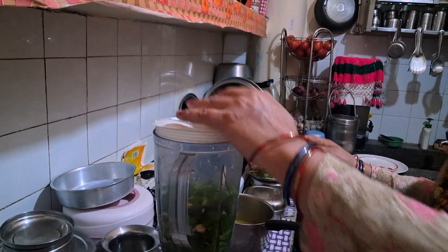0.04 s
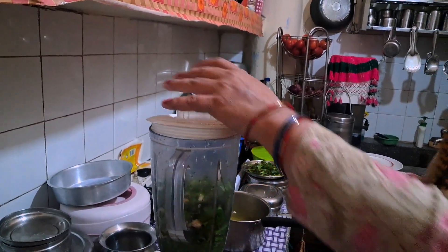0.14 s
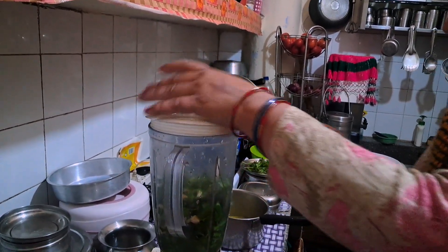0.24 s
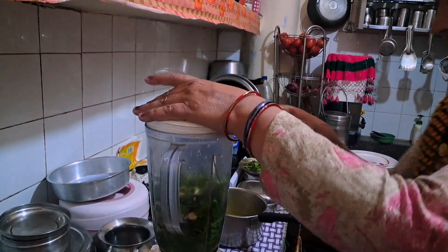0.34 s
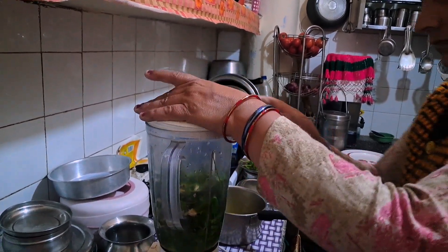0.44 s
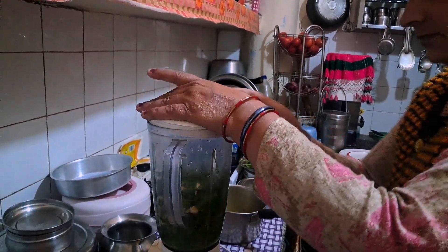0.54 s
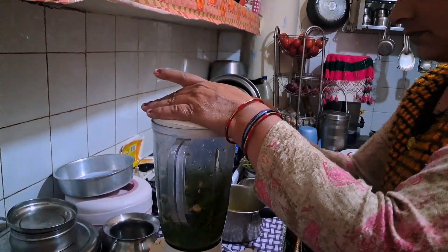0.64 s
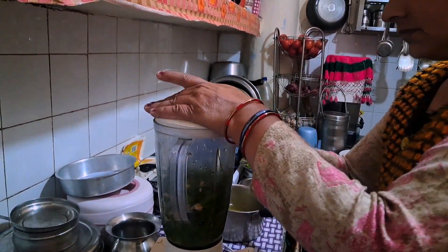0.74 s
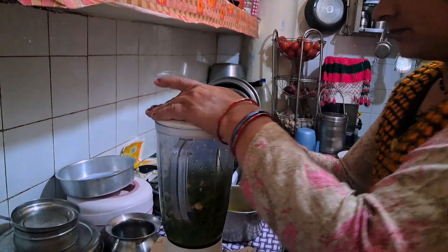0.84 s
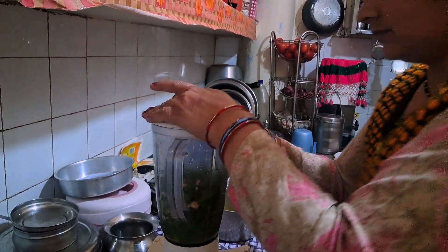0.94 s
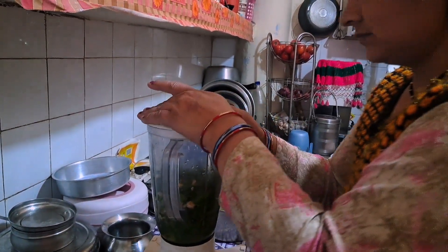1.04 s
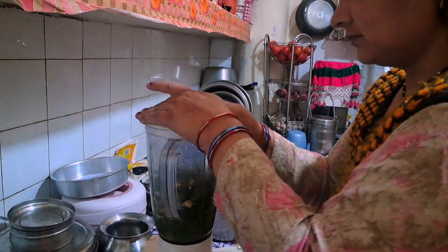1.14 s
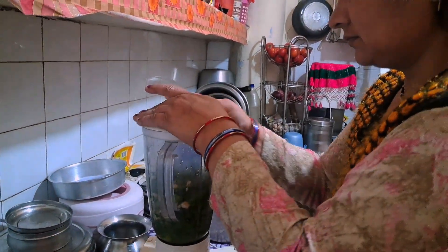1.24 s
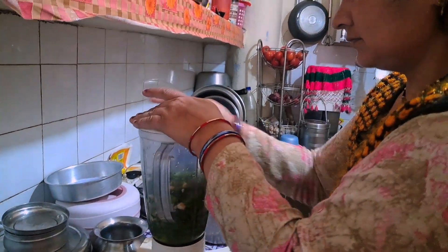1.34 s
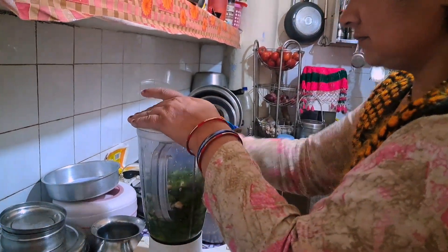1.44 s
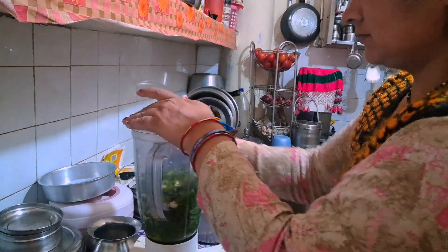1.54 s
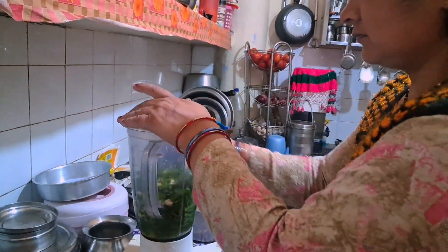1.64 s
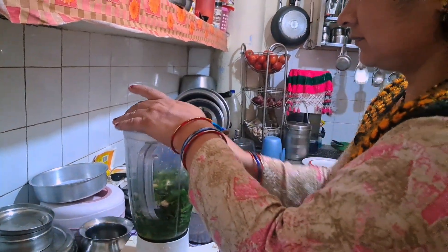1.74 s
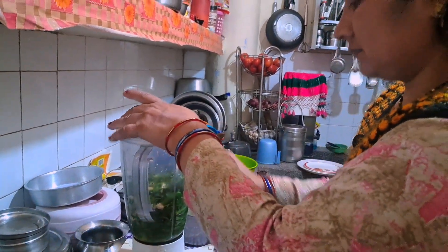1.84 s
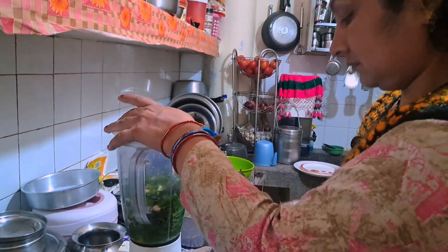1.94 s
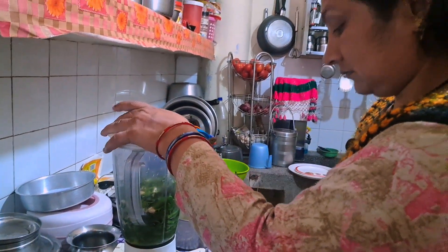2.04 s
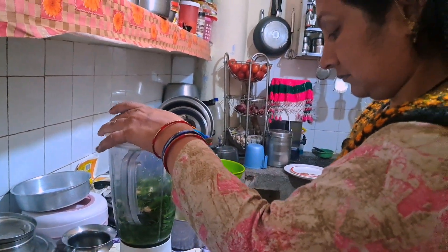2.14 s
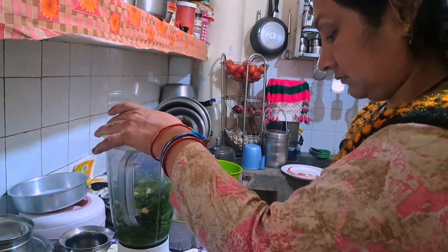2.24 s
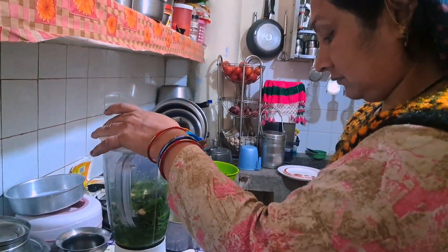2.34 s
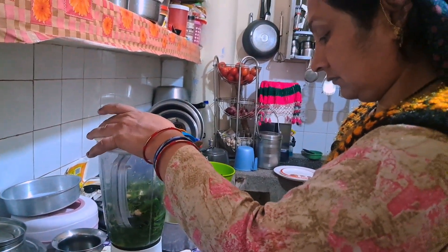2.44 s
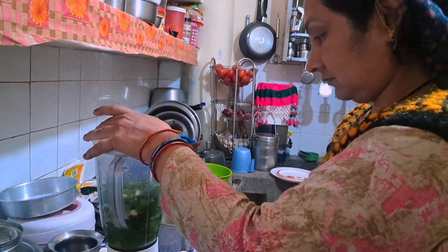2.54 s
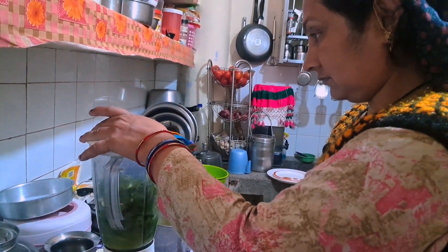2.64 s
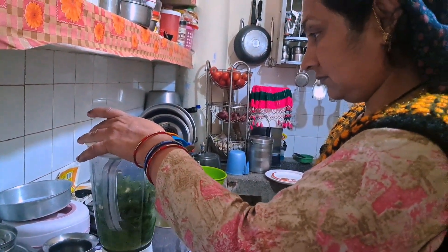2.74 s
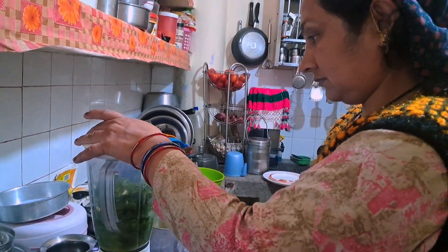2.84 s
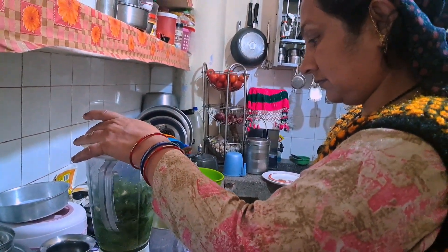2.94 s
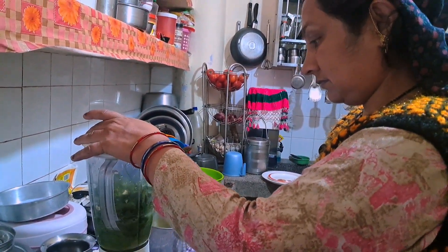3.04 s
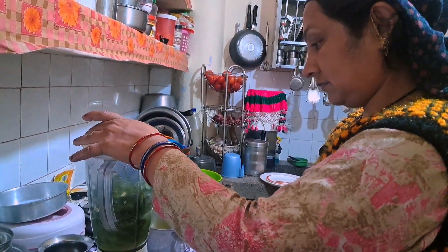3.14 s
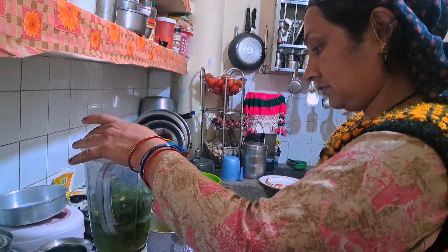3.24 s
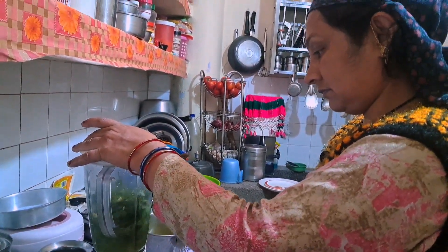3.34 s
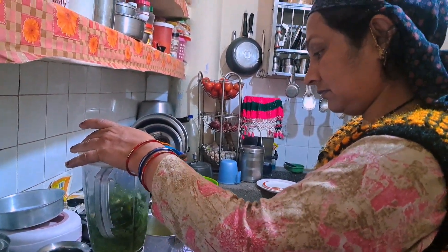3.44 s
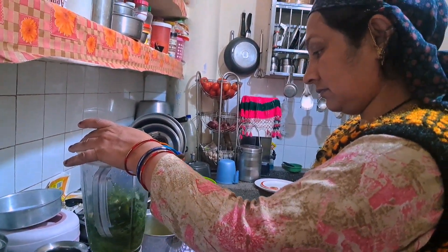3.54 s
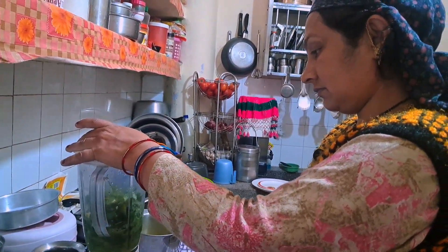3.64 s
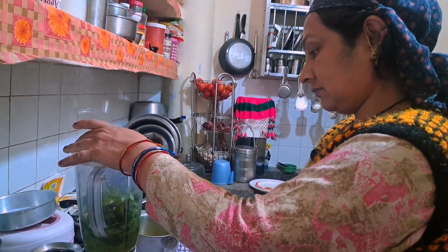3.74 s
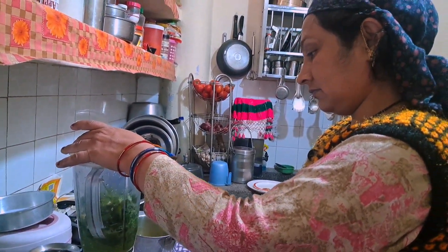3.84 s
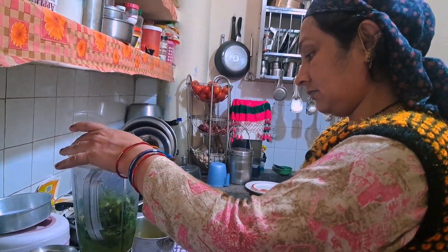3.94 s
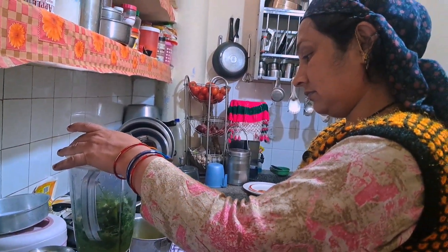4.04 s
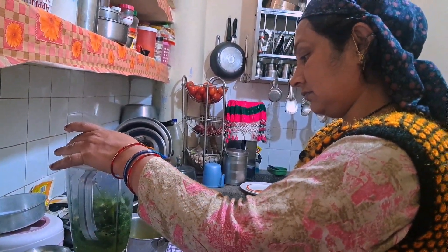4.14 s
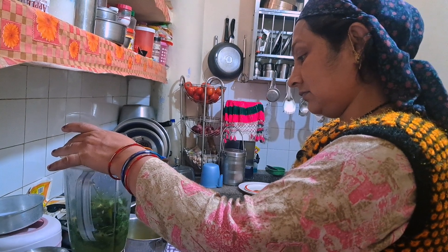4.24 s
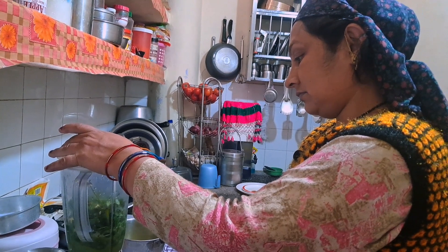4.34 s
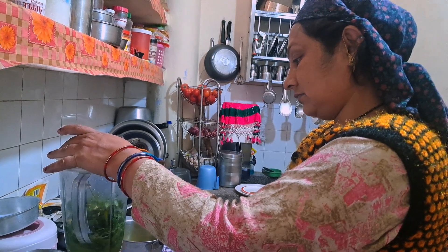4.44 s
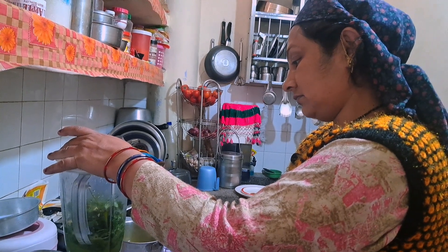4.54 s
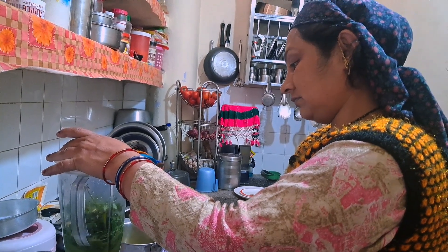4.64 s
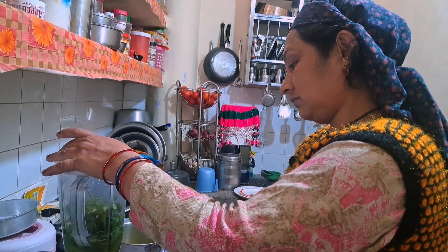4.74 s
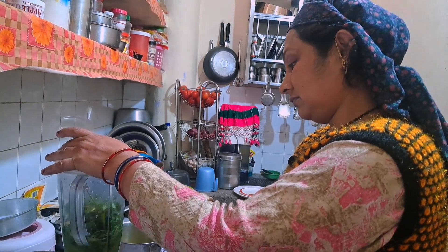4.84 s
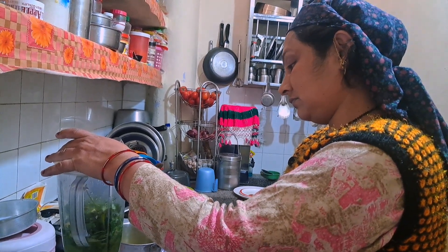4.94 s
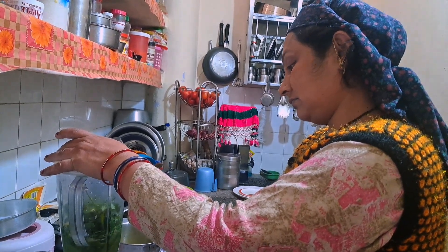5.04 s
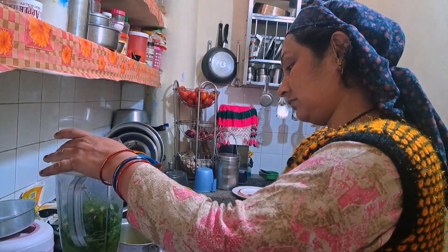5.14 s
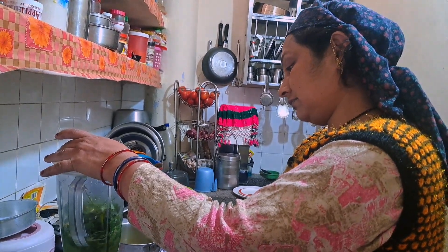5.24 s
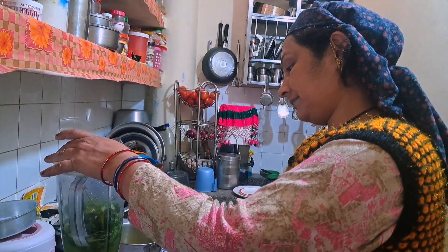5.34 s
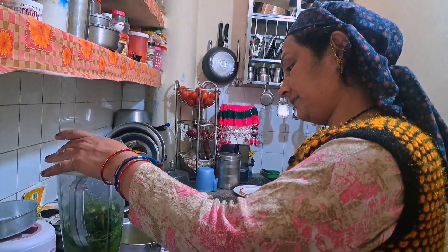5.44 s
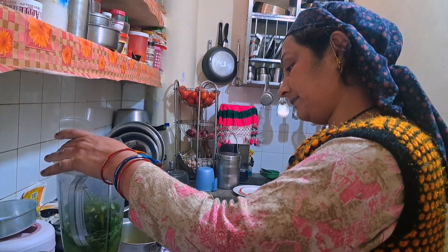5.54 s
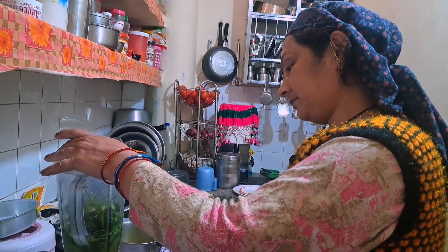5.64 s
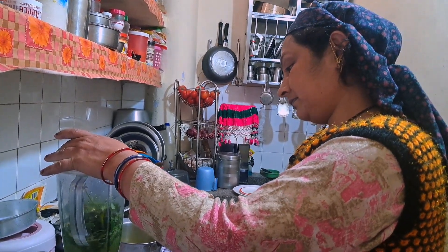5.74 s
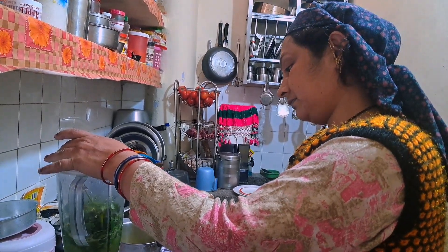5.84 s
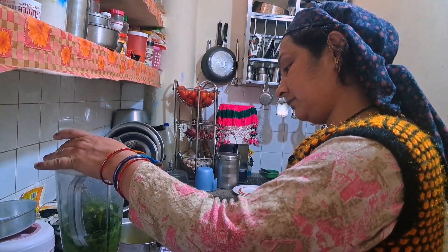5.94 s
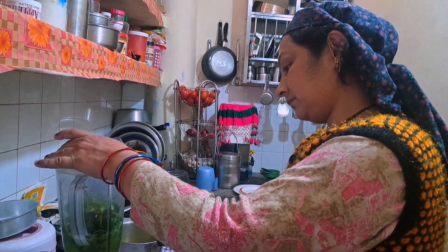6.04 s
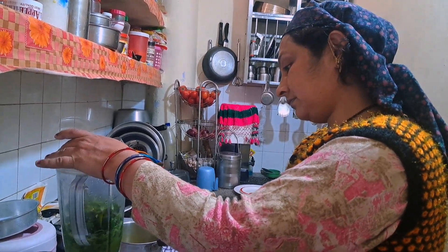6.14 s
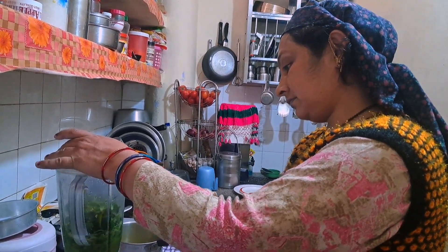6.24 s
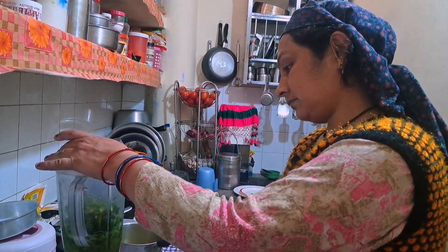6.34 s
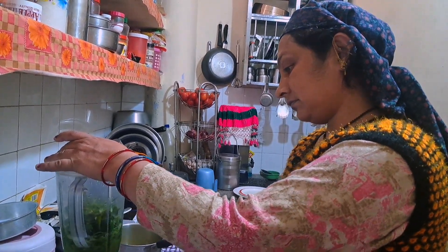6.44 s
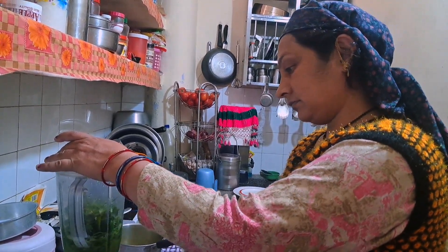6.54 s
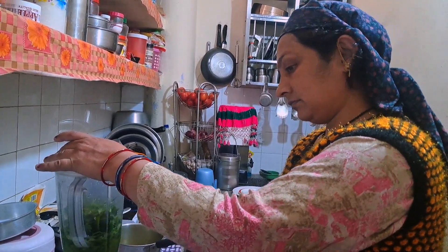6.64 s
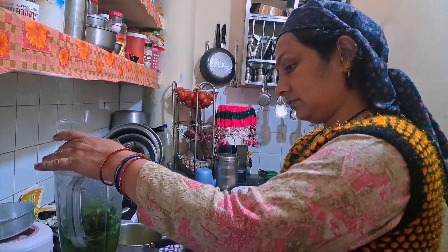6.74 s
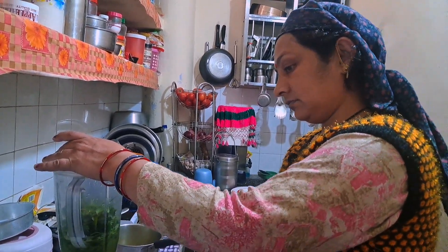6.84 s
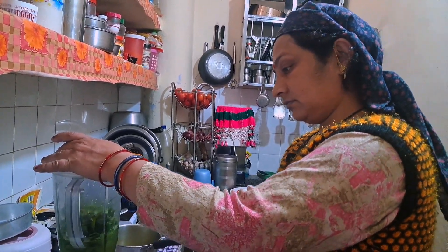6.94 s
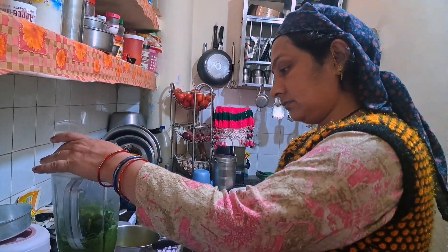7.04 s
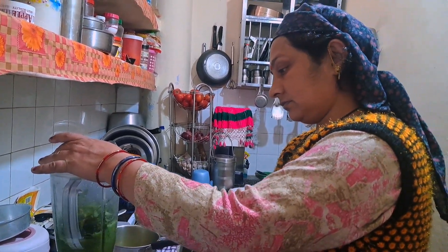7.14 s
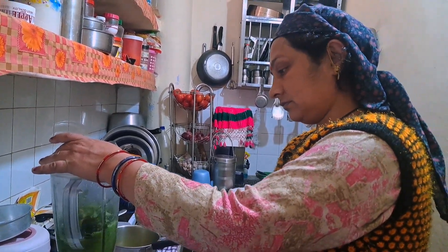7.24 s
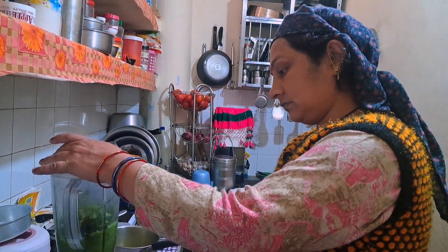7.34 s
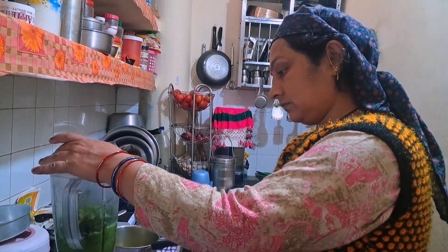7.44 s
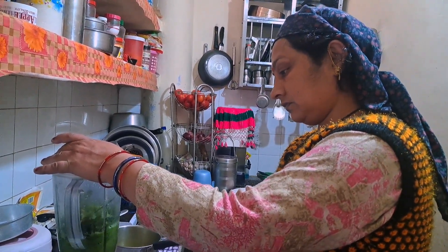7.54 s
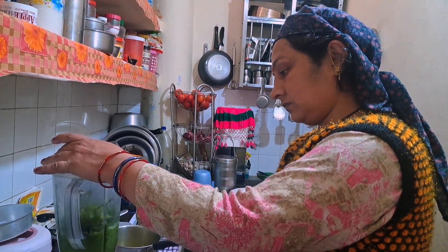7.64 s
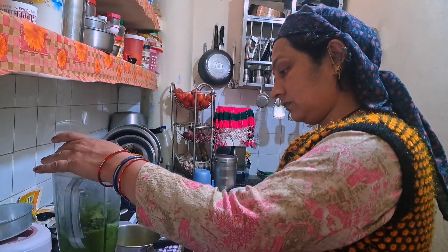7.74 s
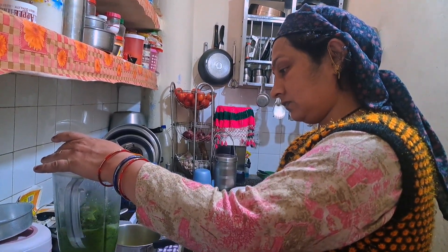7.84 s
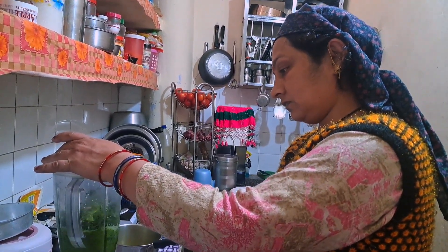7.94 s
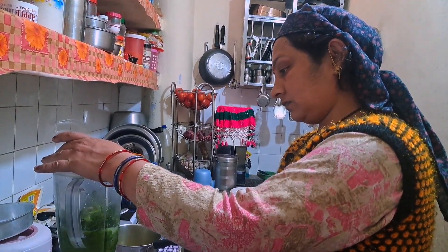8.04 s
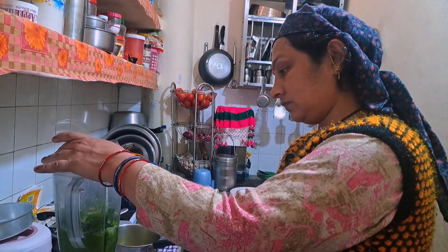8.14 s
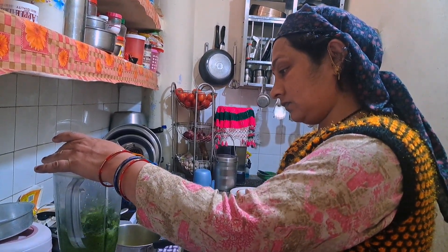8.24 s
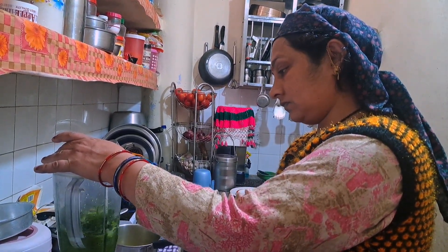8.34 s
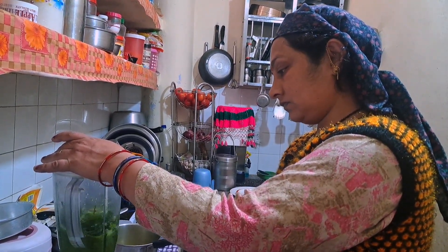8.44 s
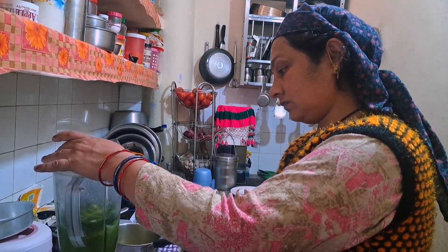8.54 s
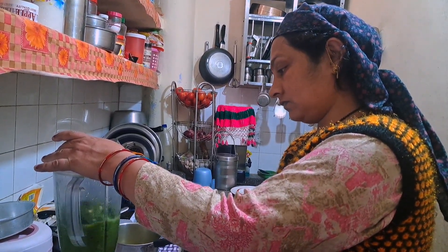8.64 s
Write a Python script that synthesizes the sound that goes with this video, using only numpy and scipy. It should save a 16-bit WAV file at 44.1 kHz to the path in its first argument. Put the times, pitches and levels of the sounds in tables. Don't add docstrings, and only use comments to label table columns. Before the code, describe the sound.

Close up in a tiled kitchen, a hand seats a plastic blender lid with dull knocks, rubs and cloth swishes while glass bangles clink brightly. The sound nearly cuts out for over half a second, then a switch clicks and the motor jerks, runs up and roars continuously. Chopped bits tick on the jar wall, which hums now and then. Phone microphone at arm's length.

```python
import sys
import numpy as np
from scipy import signal
from scipy.fft import rfft, irfft
from scipy.io import wavfile
from scipy.ndimage import uniform_filter1d

SR = 44100
rng = np.random.default_rng(int(sys.argv[2]) if len(sys.argv) > 2 else 0)


def gain_from_decibels(decibels):
    exponent = np.asarray(decibels, float) / 20
    return 10 ** exponent


def bounce(signal):
    frames = np.transpose(np.atleast_2d(signal))
    limited = np.clip(frames, -1, 1)
    pcm = np.round(limited * 32767).astype(np.int16)
    wavfile.write(sys.argv[1], SR, pcm)


N = 383669
T = np.arange(N) / SR
MUTE_S, START_S = 1.903, 2.551

# peak_s, length_s, level_db, kind
STROKES = [(0.47, .26, -43, "lean"), (0.9, 0.18, -49, "lean"), (1.123, .2, -47.5, "lean"),
           (1.6, 0.11, -54.5, "lean"), (1.58, .12, -64.5, "lean"), (0.868, 0.27, -50, "rub"),
           (1.117, 0.1, -48.5, "rub"), (1.3, .15, -55.5, "rub"), (0.388, 0.21, -52.5, "swish"),
           (0.75, 0.39, -62.5, "swish"), (1.207, 0.11, -64, "swish"), (0.23, .1, -57.5, "rub"),
           (1.445, .1, -52, "swish"), (1.567, .14, -55.5, "swish"), (1.92, .25, -76, "lean"),
           (1.92, .2, -88, "rub"), (2.554, 0.065, -55, "rub"), (2.553, 0.12, -71, "swish")]
# freq_hz, level_db (per Hz)
RUB_TONE = [(15, -33), (25, -8), (117, 0.5), (170, -17), (249, -9.5), (463, -18), (560, -17.5), (1260, -14),
            (1740, -20), (2220, -21), (4140, -39.5), (11000, -37), (16000, -53)]
# start_s, length_s, level_db, centre_hz
PUFFS = [(0.05, 0.038, -71, 4100), (0.823, 0.14, -56, 9500), (1.069, 0.02, -52.5, 7300),
         (1.34, 0.12, -55.5, 8400), (1.437, .014, -50, 9000), (1.332, 0.17, -55, 760),
         (1.39, 0.019, -46, 1760), (1.431, 0.021, -52, 2100), (1.87, 0.036, -66, 8000),
         (1.465, 0.077, -55.5, 210)]
# start_s, length_s, level_db, centre_hz
SNAP = (0.838, 0.012, -50, 1900)
# time_s, pitch_hz, level_db
SQUEAK = [(0.71, 2450, -65), (0.73, 2620, -62), (0.775, 2780, -70), (0.81, 2720, -65), (0.845, 2580, -66)]
# start_s, peak_db, sharpness_db, t60_s, brightness_db (per octave)
KNOCKS = [(0.001, -27, -22, 0.2, -3), (0.329, -34.5, -22, 0.17, -9), (0.348, -31, -17, 0.21, -8),
          (0.393, -13, -20, 0.16, -0.5), (0.408, -24.5, -30, 0.1, -9), (0.843, -25.5, -28, 0.1, 0),
          (0.86, -27, -24, 0.092, -11), (0.918, -33.5, -14, 0.12, 4), (1.073, -22, -0.5, 0.13, 10),
          (1.096, -31.5, -16, 0.11, -7), (1.191, -42.5, -11.5, 0.15, 1.5), (2.503, -46.5, -15, 0.34, -1),
          (2.5524, -19.5, -15, 0.23, 23)]
# freq_hz, width_hz, level_db
JAR_MODES = [(118, 68, -6), (218, 37, 3), (316, 25, -1), (403, 36, 2.5), (580, 160, 1), (1090, 450, -7.5),
             (2280, 910, -24.5)]
BANGLE_HZ = [
    [14015, 14960, 12000, 13450],
    [8070, 4540, 2727, 6450, 10370, 15570],
    [8710, 4950, 3930, 7480, 1650, 11590],
    [9415, 7280, 13220, 15120, 11220, 3365, 4960],
    [11760, 15600, 12380, 7300],
]
# level_db, t60_s
BANGLE_RING = [
    [(-4, .13), (-13, .14), (-18.5, 0.21), (-27.5, .1)],
    [(-1, 0.14), (-16.5, 0.26), (-16, 0.2), (-14.5, .1), (-12.5, .14), (-7.5, .13)],
    [(0, 0.13), (-10.5, 0.11), (-27.5, 0.092), (-13.5, .15), (-28.5, .06), (-12.5, .1)],
    [(-4, 0.085), (-23.5, 0.091), (-12, 0.11), (-10.5, .12), (-13, .06), (-36.5, 0.066), (-22, 0.072)],
    [(-1.5, 0.13), (-5, 0.14), (-19.5, .14), (-12, .1)],
]
# start_s, level_db, bangles from the struck one outwards, loss_db (per neighbour), slow_modes_db
CLINKS = [(0.342, -37.5, "DCBAE", 0, -3), (0.352, -33, "DEABC", 4, -10), (0.3783, -18, "DEABC", 13, 5),
          (0.3934, -33, "DAECB", 6, 0), (0.439, -26.5, "BEDAC", 5, -7), (0.503, -53, "EDBCA", 2.5, -8),
          (0.7057, -54, "CABED", 5, -12), (1.1, -52, "BCDAE", 12, -15), (1.2899, -52, "CBEAD", 16, -14),
          (1.468, -40, "BACED", 1, 3), (1.477, -32, "AEBCD", 6, -8), (1.516, -31, "EBACD", 10, -14),
          (1.5218, -20, "AEBDC", 4, -5), (1.5283, -16.5, "ADCBE", 2.5, -1.5),
          (1.5424, -26, "ACBED", 0, -3.5), (1.556, -26, "CAEDB", 4, -0.5), (1.574, -35, "ACBED", 2.5, -6),
          (1.59, -46, "CBAED", 2, -6), (1.664, -34.5, "EDBAC", 4.5, 7), (1.679, -43, "BEDAC", 8, -3),
          (1.717, -35, "EBADC", 4, -14), (1.7258, -37.5, "BEACD", 11, 4), (1.737, -32.5, "EBACD", 3, 0),
          (2.1361, -89, "CDABE", 2, 0), (2.1818, -66.5, "EBDAC", 8, -5), (2.328, -56, "EDCBA", 3, -4),
          (2.3535, -54, "CDBEA", 5, -4), (2.384, -66, "CEDBA", 1.5, -5)]
# clink_s, mode_hz, lift_db
FAVOURED = [(0.342, 2727, 7.5), (0.342, 6450, -12), (0.342, 7280, -10.5), (0.342, 7480, -12),
            (0.342, 8710, -12.5), (0.342, 11590, -13), (0.342, 11760, -14.5), (0.342, 12000, -14),
            (0.342, 13220, 8), (0.342, 14015, -7), (0.342, 15570, -7), (0.351, 9415, 4), (0.351, 14015, -8),
            (0.3783, 2727, 9.5), (0.3783, 13220, -7.5), (0.3783, 13450, -8.5), (0.3783, 14960, -8.5),
            (0.3783, 15120, -8.5), (0.3783, 15570, -9), (0.3934, 9415, 7), (0.3934, 10370, 10.5),
            (0.4392, 3930, 11), (0.4392, 9415, 7.5), (0.4392, 11590, -8), (0.4392, 11760, -8),
            (0.503, 8710, -10), (1.4683, 11590, -6.5), (1.4683, 11760, -7), (1.4683, 15120, 6),
            (1.4683, 15570, 6.5), (1.516, 8070, 8.5), (1.516, 8710, -10), (1.516, 14015, -5.5),
            (1.5289, 2727, -7.5), (1.5424, 6450, -13.5), (1.5424, 8710, 4), (1.5424, 13450, 8),
            (1.5424, 14015, 9.5), (1.5424, 15570, -5), (1.556, 4540, 9), (1.556, 9415, 5.5),
            (1.556, 13450, 6), (1.556, 14015, 5.5), (1.59, 8070, -9), (1.664, 4540, -13), (1.664, 7280, 5),
            (1.664, 15570, -8), (1.679, 4540, -11), (1.717, 3365, -15), (1.7263, 14960, 7),
            (1.7263, 15120, 7), (1.7263, 15570, 9), (1.737, 4950, -10), (2.328, 3930, 13),
            (2.328, 7280, -12), (2.328, 12000, 8), (2.328, 12380, 14), (2.3535, 3930, 11),
            (2.3535, 4540, 11), (2.3535, 12380, 10)]
# start_s, peak_db, centre_hz
BITS = [(2.6612, -22, 4320), (2.7714, -10, 7450), (2.8018, -21, 4750), (2.9346, -19, 4100),
        (3.3756, -17, 4640), (7.757, -32, 4120), (8.0529, -19, 5930), (8.481, -32, 4316),
        (8.5099, -29, 5350)]
# start_s, peak_db, centre_hz
SEEDS = [(2.7453, -22, 4320), (2.7712, -19, 3890), (2.9348, -23, 4175), (3.0481, -19, 4230),
         (3.2387, -28, 3960), (3.2646, -26, 3850), (3.3753, -23, 4640), (3.6397, -30, 4220),
         (3.7096, -27, 3840), (3.7645, -36, 4240), (4.7382, -29, 3830), (4.8774, -26, 3840),
         (5.4811, -27, 4150), (5.6342, -28.5, 3920), (5.7135, -28, 3890), (6.5776, -25, 4180),
         (6.6728, -23, 5490), (6.7696, -19, 4650), (6.924, -25, 5330), (7.0834, -22, 5230),
         (7.1458, -33, 5640), (7.2371, -26, 3920), (7.6212, -27, 5450), (7.6591, -24, 3870),
         (7.7574, -21, 3860), (7.9684, -27, 5510), (8.0253, -32.5, 3840), (8.0507, -27, 5930),
         (8.3351, -19, 3850), (8.4812, -27, 3800)]
# freq_hz, level_db, t60_s
BASE_MODES = [(224, -4, 0.4), (409, -6, 0.12), (740, -5, 0.04), (1109, -12, 0.05)]
# from_s, to_s, centre_hz, width_hz, level_db
VENTS = [(2.6, 3.6, 13300, 500, -62), (2.4, 4.6, 12300, 500, -64), (2.67, 3.6, 10500, 500, -59),
         (4.7, 9, 10700, 900, -59.5), (3.4, 9, 13100, 700, -57.5)]
# peak_s, length_s, level_db, pitch_hz
SINGING = [(2.952, 0.19, -33, 440), (3.259, 0.097, -46, 460), (4.497, 0.126, -34.5, 406),
           (4.696, 0.13, -33.5, 403), (4.9, 0.091, -35.5, 409), (5.269, 0.14, -33, 409),
           (5.383, .05, -40, 320), (5.55, .2, -33.5, 408), (6.005, 0.16, -39, 405), (6.32, .15, -31.5, 405),
           (6.559, .07, -38, 408), (6.75, .08, -34.5, 412), (7.305, 0.21, -34, 404), (7, .06, -33, 402),
           (4.7, .06, -38, 423), (8.302, .1, -38, 411), (9.7, .12, -33, 490), (8.8, .07, -29.5, 1700),
           (6.597, 0.055, -33, 2010), (4.4, .2, -44, 1225), (8.58, 0.08, -30, 690), (8.5, 0.078, -35, 500),
           (6.849, 0.154, -34.5, 690), (4.55, .2, -37, 450), (5.55, .2, -36.5, 690), (4.9, .2, -36, 550),
           (8.05, 0.0823, -35, 690), (6.9, .25, -45, 520), (7.7, .06, -32.5, 500), (2.82, .1, -38, 380),
           (2.78, .08, -36, 325)]
# peak_s, length_s, level_db
SURGES = [(2.575, 0.016, 7.5), (2.785, 0.21, 3.5), (3.036, 0.021, -1), (3.357, 0.17, 2.5),
          (3.45, 0.11, -3.5), (3.662, 0.032, 1), (5.875, 0.53, 1.3), (6.3, 0.35, -0.5), (7.53, 0.088, -0.5),
          (7.258, 0.035, 3), (7.665, .06, 3.5), (7.765, 0.068, 2.5), (8.067, 0.037, 4), (8.424, 0.13, 0.5),
          (8.46, 0.019, -3.5), (8.53, 0.15, 3.5), (8.7, 0.036, 2.5)]
# time_s, shaft_hz, unbalance_db, blade_db
SHAFT = [(2.8, 187.6, -40.5, -41), (3.0, 214, -31.5, -39), (3.22, 225.3, -25.5, -30),
         (3.42, 226.1, -32.5, -34.5), (3.56, 239.5, -30, -35.5), (4.3, 247.2, -40.5, -36),
         (5.1, 253.6, -38, -38), (5.72, 262, -45.5, -34), (5.88, 250.7, -36, -34.5),
         (6.42, 261.3, -42.5, -45), (6.88, 261, -45, -39), (7.1, 248.4, -34, -33), (7.6, 257.2, -41, -36.5),
         (7.76, 246.2, -34.5, -37), (8.08, 250.4, -35.5, -35), (8.3, 258.3, -46.5, -35.5),
         (8.47, 253.4, -38, -42), (8.56, 238, -28, -34.5)]
# peak_s, length_s, unbalance_db, blade_db
SWALLOWED = [(3.13, 0.053, 2, -8), (3.414, .04, 2, -10), (3.838, 0.082, 3, -16), (5.45, 0.18, -7.5, -2),
             (5.757, 0.24, -5, -7), (6.333, 0.1, -12, 9), (6.645, 0.17, -9.5, -3), (6.994, .06, -9, -3),
             (7.285, .05, -3, -12), (7.673, .05, -8, -10), (7.974, 0.068, -11, -0.5), (8.07, .05, 0, -12),
             (8.4, .08, -6, 6)]
# order, resonance_hz, width_hz, level_db (over its load), steepness
SHAKEN = [(1, 190, 400, -1, .1), (2, 458, 85, -9, 1.4), (3, 600, 900, -1.5, .1), (4, 950, 256, -9, 1.3),
          (5, 1174, 180, -8, 1.8), (6, 1406, 110, -6, 1.4)]
# freq_hz, level_db (per Hz)
ROAR_TONE = [(15, -94), (25, -63), (87, -18.5), (185, -19.5), (242, 0.5), (354, -6.5), (405, -5), (560, -6),
             (754, -6), (1560, -11.5), (2000, -6.5), (3340, -20.5), (5430, -24.5), (12900, -27.5),
             (16000, -49)]
# freq_hz, width_hz, lift_db
BODY = [(106, 21, 6.5), (254.7, 32, -8), (281.6, 38, -8), (407.7, 40, 9), (511, 216, -7), (663, 72, 6.5),
        (950, 186, 7), (1123, 78, 6.5), (1407, 37, 7), (1980, 185, 8), (2225, 166, 8.5), (2515, 150, 9),
        (3370, 160, -1.5), (3870, 133, 8), (4340, 910, 6.5), (4950, 160, -10.5), (5555, 1550, 10),
        (7840, 650, 4), (8800, 570, -2), (10910, 810, 2), (156, 55, -1), (13300, 1000, -1.5)]
SPLIT_HZ = (170, 560, 1500, 3200)


def colour(x, tone, peaks=()):
    f = np.linspace(1, SR / 2, 4097)
    tone_hz, tone_db = np.array(tone).T
    db = np.interp(np.log(f), np.log(tone_hz), tone_db)
    db = db + sum(lift / (1 + ((f - hz) * 2 / width) ** 2) for hz, width, lift in peaks)
    cepstrum = irfft(np.log(gain_from_decibels(db)))
    cepstrum[1:4096] *= 2
    cepstrum[4097:] = 0
    return signal.fftconvolve(x, irfft(np.exp(rfft(cepstrum))))[:len(x)]


def band(x, lo_hz, hi_hz):
    return signal.sosfilt(signal.butter(4, [lo_hz, hi_hz], "band", fs=SR, output="sos"), x)


def unit(x):
    return x / np.sqrt(np.mean(x ** 2))


def walk(rate_hz):
    k = int(SR / rate_hz)
    held = np.repeat(rng.standard_normal(N // k + 1), k)
    return unit(uniform_filter1d(uniform_filter1d(held, k), k)[:N])


def curves(rows):
    s, *columns = np.transpose(rows)
    return [np.interp(T, s, c) for c in columns]


def add(out, s, sound):
    i = int(s * SR)
    out[i:i + len(sound)] += sound[:N - i]


def fade(t, t60):
    return np.exp(-np.log(1000) * t / t60)


def near(s, length):
    return np.clip(1 - np.abs(T - s) / length, 0, 1)


def bands(x, edges_hz, levels_db, flicker_db, rate_hz):
    cuts = (20, *edges_hz, 17000)
    out = 0
    for lo, hi, db in zip(cuts[:-1], cuts[1:], levels_db):
        out = out + unit(band(x, lo, hi)) * gain_from_decibels(db + flicker_db * walk(rate_hz))
    return out


def kitchen(x, wet_db):
    t = T[:SR // 2]
    tail = rng.standard_normal(len(t)) * fade(t, 0.18)
    tail += 3.7 * band(rng.standard_normal(len(t)), 55, 2000) * fade(t, 0.33)
    tail[:200] = 0
    return x + gain_from_decibels(wet_db) * signal.fftconvolve(x, tail / np.sqrt(np.sum(tail ** 2)))[:N]


def pressure():
    rise, drop_db = 0.41, 13.5
    open_db, muted_db = (-68, -68.5, -68), (-87, -99, -93.5)
    power = [gain_from_decibels(2 * np.where(T < MUTE_S, a, b)) for a, b in zip(open_db, muted_db)]
    for s, length, db, kind in STROKES:
        away = np.maximum((s - T) / rise, (T - s) / (1 - rise)) / length
        heard = (T < MUTE_S) == (s < MUTE_S)
        k = ("lean", "rub", "swish").index(kind)
        power[k] = power[k] + heard * gain_from_decibels(2 * (db - drop_db * away))
    return 10 * np.log10(power)


def squeak():
    hz, db = curves(SQUEAK)
    on = (T > SQUEAK[0][0]) & (T < SQUEAK[-1][0])
    phase = 2 * np.pi * np.cumsum(hz * (1 + 0.008 * walk(90))) / SR
    return on * gain_from_decibels(db + 6 + 1.5 * walk(61)) * np.sin(phase)


def hands():
    noise = colour(rng.standard_normal(N), RUB_TONE)
    out = bands(noise, (400, 3500), pressure(), 0.82, 30) * (T < 2.56)
    for s, length, db, hz in [*PUFFS, SNAP]:
        swell = np.sin(np.pi * np.linspace(0, 1, int(length * SR))) ** 1.2
        air = band(rng.standard_normal(len(swell)), hz * 0.5, min(hz * 1.48, 16000))
        add(out, s, gain_from_decibels(db) * swell * unit(air))
    return out + squeak()


def knocks():
    out, t = np.zeros(N), T[:SR // 2]
    for s, peak_db, sharp_db, t60, tilt_db in KNOCKS:
        uneven = gain_from_decibels(4.4 * rng.standard_normal(len(t) // 300 + 1)).repeat(300)[:len(t)]
        rattle = rng.standard_normal(len(t)) * fade(t, max(t60, 0.02)) * uneven
        push = 2.4 * fade(t, 0.0006) + 0.5 * rattle
        body = 0
        for hz, width, db in JAR_MODES:
            r = np.exp(-np.pi * width / SR)
            resonator = [1, -2 * r * np.cos(2 * np.pi * hz / SR), r * r]
            body = body + gain_from_decibels(db + tilt_db * np.log2(hz / 400)) * signal.lfilter([1, 0, -1], resonator, push)
        crack = band(rng.standard_normal(len(t)) * (fade(t, 0.0039) + 0.11 * fade(t, 0.1)), 1100, 4900)
        add(out, s, gain_from_decibels(peak_db) * (body / np.abs(body).max() + gain_from_decibels(sharp_db) * crack))
    return out


def stray_modes(t, level_db):
    pitch, size, ring_s = rng.random((3, 14, 1))
    hz = 1500 + 14300 * pitch ** 0.8
    db = level_db - 20 - 9.9 * size + 7.5 * np.log2(hz / 9000)
    return np.sum(gain_from_decibels(db) * fade(t, 0.02 + 0.07 * ring_s) * np.sin(2 * np.pi * hz * t), axis=0)


def bangles():
    out, t = np.zeros(N), T[:SR // 4]
    choked = 0.83 * fade(t, 0.02)
    for s, level_db, order, step_db, slow_db in CLINKS:
        haze = rng.standard_normal(len(t)) * (fade(t, 0.008) + 0.18 * fade(t, 0.09))
        ring = gain_from_decibels(level_db - 2.5) * band(haze, 6500, 16000) + stray_modes(t, level_db)
        for name, tones, modes in zip("ABCDE", BANGLE_HZ, BANGLE_RING):
            share_db = level_db - step_db * order.index(name)
            for hz, (mode_db, t60) in zip(tones, modes):
                luck = rng.standard_normal(4)
                db = share_db + mode_db + slow_db * (hz < 5500) + 0.74 * luck[1]
                db += sum(lift for at, mode_hz, lift in FAVOURED if abs(at - s) < 0.004 and abs(mode_hz - hz) < 60)
                if s < 1.4 and abs(hz - 4500) < 700:
                    db -= 7.5
                split_hz = 0.0044 * hz * gain_from_decibels(4.8 * luck[3])
                beat = 1 + 0.52 * np.cos(2 * np.pi * split_hz * t + 6 * luck[0])
                tone = np.sin(2 * np.pi * hz * (1 + 0.0015 * luck[2]) * t)
                ring += gain_from_decibels(db) * beat * (fade(t, t60) + choked) * tone
        add(out, s, ring * np.minimum(t / 0.00053, 1))
    return out


def jerk():
    out, t = np.zeros(N), T[:SR // 3]
    for s, bump_db in ((2.5645, -18), (2.5735, -16.5)):
        modes = sum(gain_from_decibels(db) * fade(t, t60) * np.sin(2 * np.pi * hz * t) for hz, db, t60 in BASE_MODES)
        add(out, s, gain_from_decibels(bump_db) * modes)
    return band(out, 190, 8000)


def bits():
    out, t = np.zeros(N), T[:SR // 20]
    for s, peak_db, hz in [*BITS, *[(s, db - 4, hz) for s, db, hz in SEEDS]]:
        tick = rng.standard_normal(len(t)) * fade(t, 0.021)
        bright = 0.53 * gain_from_decibels(0.35 * (peak_db + 18)) * band(tick, 3800, 13400)
        pitched = 1.4 * band(tick, hz * 1.02, hz * 1.1)
        add(out, s, gain_from_decibels(peak_db - 7) * (bright + pitched))
    return out


def vents():
    out, air = 0, rng.standard_normal(N)
    for start, end, hz, width, db in VENTS:
        on = np.clip(np.minimum(T - start, end - T) / 0.25, 0, 1)
        out = out + gain_from_decibels(db) * on * unit(signal.lfilter(*signal.iirpeak(hz, hz / width, fs=SR), air))
    return out * gain_from_decibels(1.4 * walk(15))


def singing():
    out, rough_db, waver = np.zeros(N), 2 * walk(40), 0.0116 * walk(35)
    for s, length, db, hz in SINGING:
        on = np.abs(T - s) < length
        swell = (1 - np.abs(T[on] - s) / length) ** 0.38
        phase = 2 * np.pi * np.cumsum(hz * (1 + waver[on])) / SR
        out[on] += gain_from_decibels(db + rough_db[on]) * swell * np.sin(phase)
    return out


def shaft_tones(shaft_hz, turn, unbalance_db, blade_db):
    for s, length, first_db, pulp_db in SWALLOWED:
        unbalance_db = unbalance_db + first_db * near(s, length)
        blade_db = blade_db + pulp_db * near(s, length)
    tones = 0
    for k, peak_hz, width, db, steep in SHAKEN:
        load_db = unbalance_db + 1.6 * walk(20) if k == 1 else blade_db + 2.6 * walk(12)
        off_db = steep * 10 * np.log10(1 + ((k * shaft_hz - peak_hz) * 2 / width) ** 2)
        tones = tones + gain_from_decibels(db + 2.5 + load_db - off_db) * np.sin(k * turn)
    return tones * np.clip((T - 2.78) / 0.1, 0, 1)


def roar_levels(since):
    surge_db = sum(db * near(s, length) for s, length, db in SURGES)
    settle_db = 12.5 * np.exp(-since / 0.19)
    slow_db = 18.5 * np.exp(-since / 0.076)
    held_db = -7 * np.clip((2.63 - T) / 0.035, 0, 1)
    rumble_db = -53.5 + 2 * settle_db - 1.7 * slow_db + 0.85 * surge_db
    shake_db = -39 + settle_db + 0.86 * walk(16) + 1.1 * surge_db - 0.3 * slow_db + held_db
    cut_db = surge_db + 3 * np.exp(-since / 0.26) - 0.57 * slow_db
    chop_db = cut_db - 34.5 - 4.5 * np.exp(-since / 0.58)
    hiss_db = -40 + 1.51 * surge_db - slow_db
    return rumble_db, shake_db, cut_db - 32.5, chop_db, hiss_db


def roar(turn):
    since = np.maximum(T - START_S, 0)
    grain = gain_from_decibels(1.1 * rng.exponential(size=N // 32 + 1)).repeat(32)[:N]
    air = rng.standard_normal(N) * grain * (1 + 0.19 * np.cos(turn))
    per_s = 140 * (1 + 3 * np.exp(-np.abs(T - START_S) / 0.46))
    struck = rng.random(N) < per_s / SR
    air += struck * gain_from_decibels(11 + 2.94 * np.minimum(rng.exponential(size=N), 3)) * np.sign(air)
    noise = bands(colour(air, ROAR_TONE, BODY), SPLIT_HZ, roar_levels(since), 1, 20)
    return noise * np.clip(since / 0.0051, 0, 1)


def motor():
    shaft_hz, unbalance_db, blade_db = curves(SHAFT)
    turn = 2 * np.pi * np.cumsum(shaft_hz * (1 + 0.00403 * walk(18))) / SR
    return shaft_tones(shaft_hz, turn, unbalance_db, blade_db) + roar(turn)


def scene():
    early, late = T < MUTE_S, T > MUTE_S + 0.2
    hits = 0
    for x, wet_db in ((bangles(), -6), (knocks() + jerk() + bits(), -14)):
        hits = hits + kitchen(x * early, wet_db) * early + kitchen(x * late, wet_db)
    return (hits + hands() + vents() + singing() + motor())[None]


def top_cut(x):
    return signal.sosfilt(signal.butter(12, 16470, fs=SR, output="sos"), x)


def record(dry):
    top = signal.sosfilt(signal.ellip(8, 0.5, 60, 15800, fs=SR, output="sos"), dry)
    return top_cut(top)


dry = scene()
out = record(dry)
bounce(out)
```